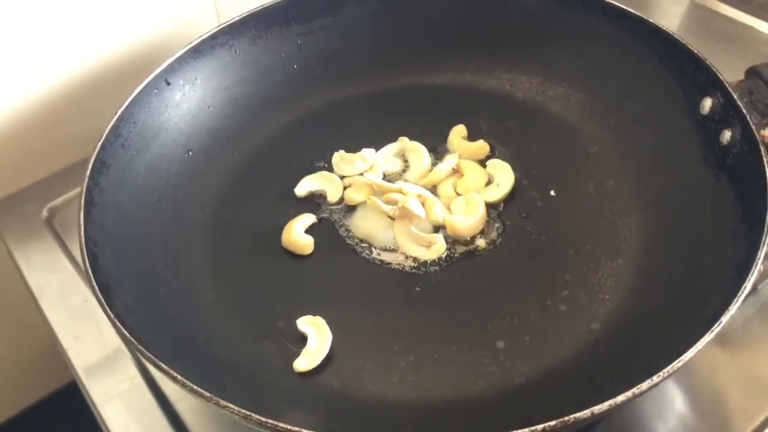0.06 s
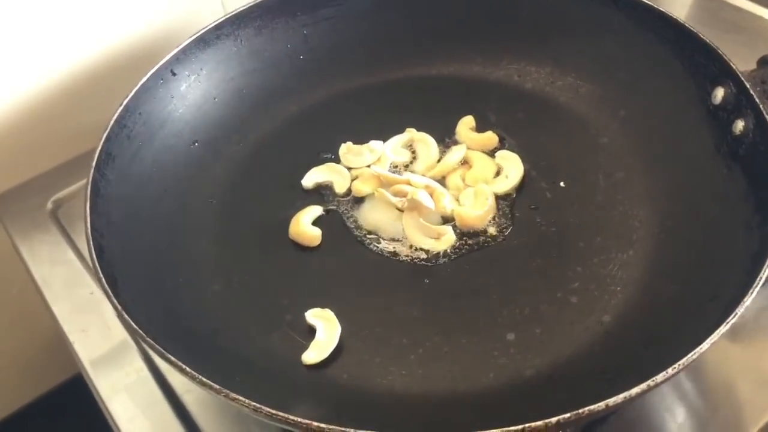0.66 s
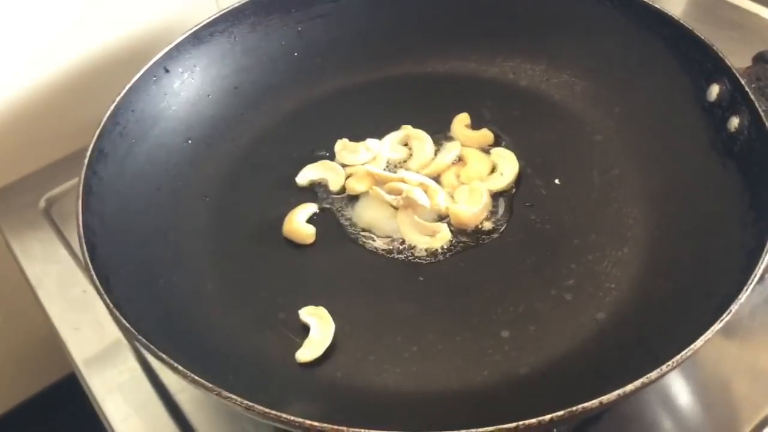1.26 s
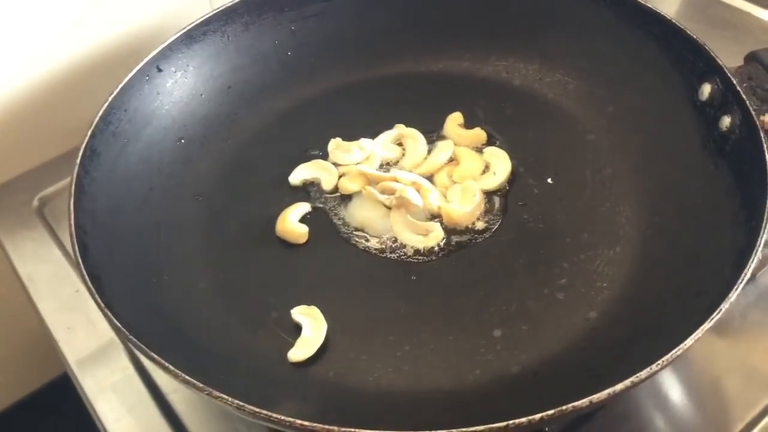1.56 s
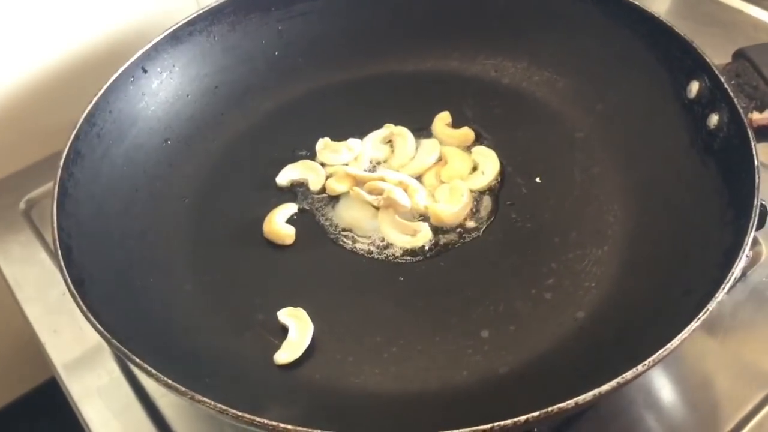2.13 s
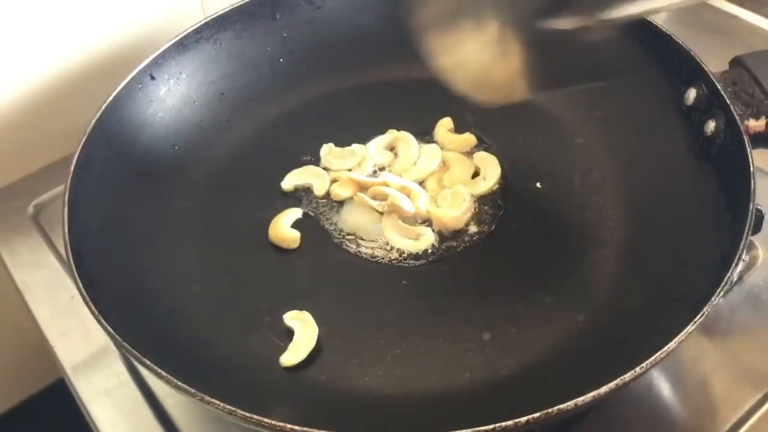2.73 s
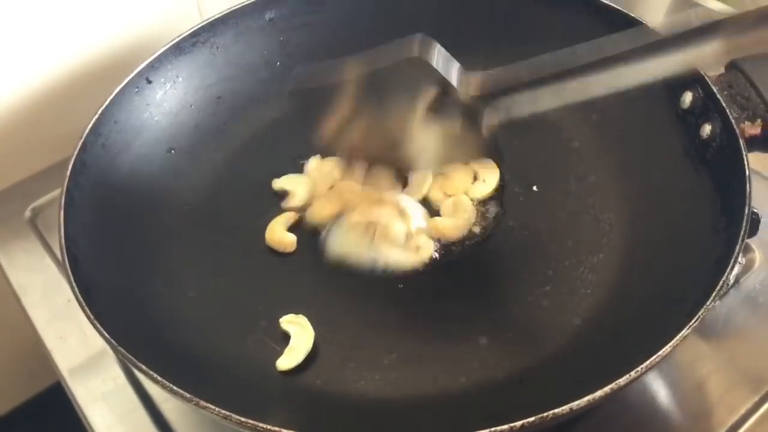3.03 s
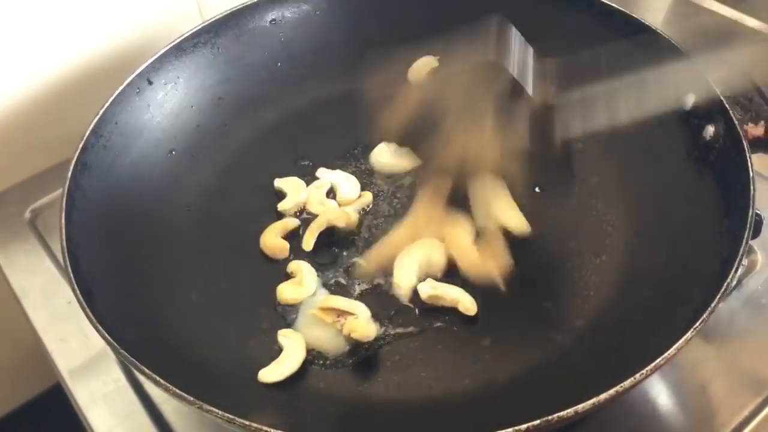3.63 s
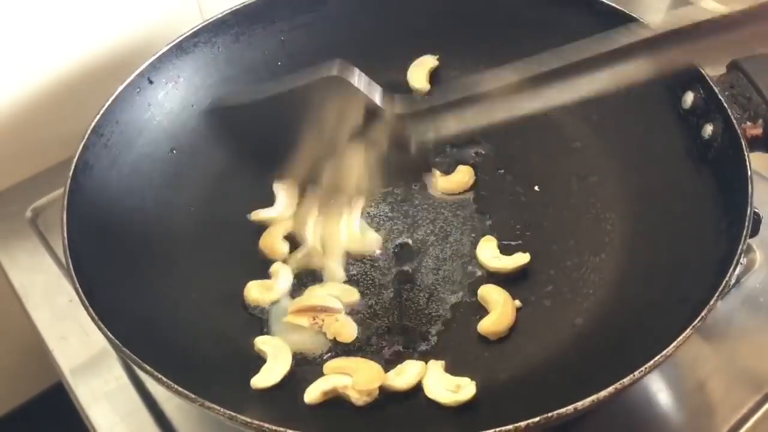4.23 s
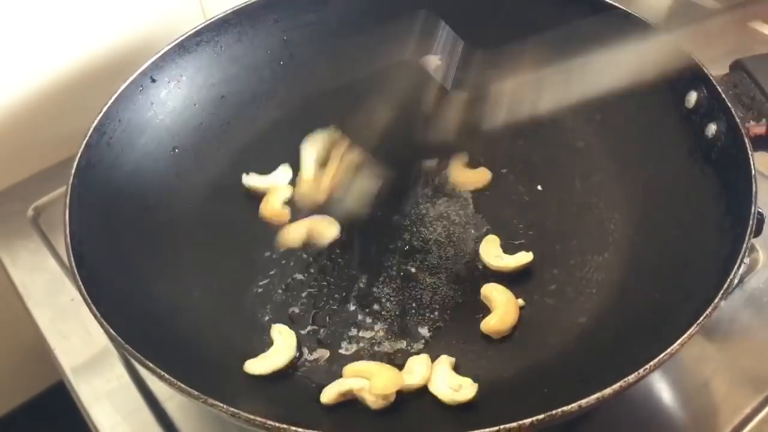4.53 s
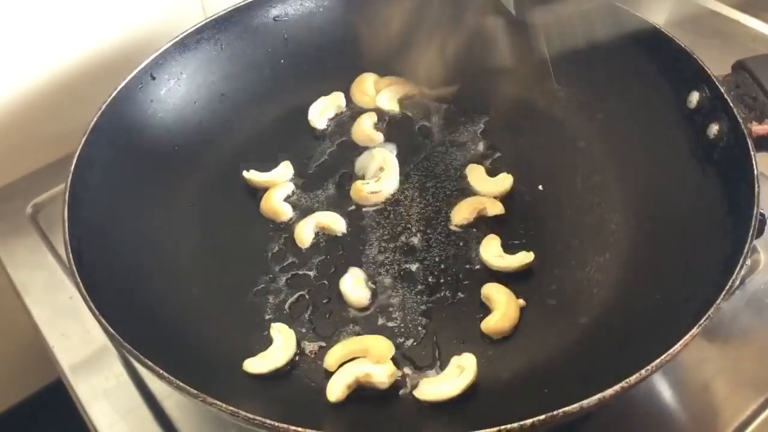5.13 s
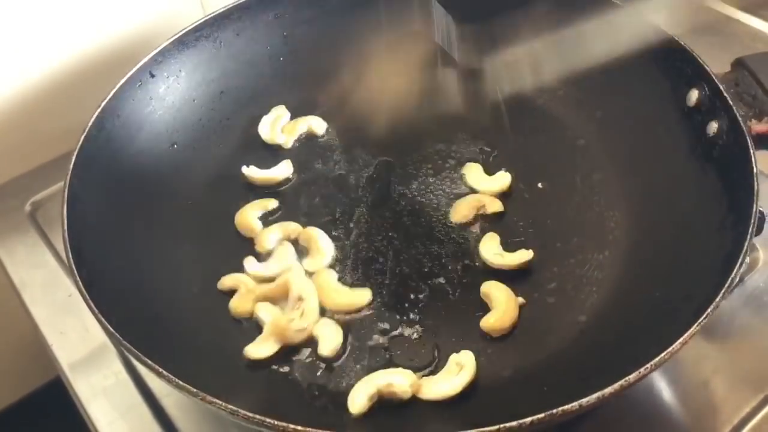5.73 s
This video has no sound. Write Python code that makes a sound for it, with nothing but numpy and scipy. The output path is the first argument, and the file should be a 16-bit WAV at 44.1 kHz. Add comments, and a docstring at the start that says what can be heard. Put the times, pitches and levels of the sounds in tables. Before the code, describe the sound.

A short burst of hissing fat and a metallic clink open a close view by ear of nuts frying in a pan. Droplets pop irregularly over a low sizzle, with a few small taps and squeaks of steam. Then a spatula knocks and scratches across the pan about three times a second, while the spread fat fizzes louder. A faint kitchen hum lies underneath.

```python
"""Cashews fry in ghee in a nonstick pan, heard up close over the faint hum of a small kitchen.
First the wet fat flares up, hissing and whistling with steam, and a steel utensil clinks.
The sizzle dies down to single pops of bursting water droplets, with light taps, more clinks and
a few squeaks of vapour. From 3 s on, a spatula turns the nuts about three times a second,
knocking on the pan so that it rings, and the spread fat fizzes up with tiny bubbles."""
import sys
import numpy as np
from scipy import signal
from scipy.fft import rfft, irfft
from scipy.io import wavfile
from scipy.ndimage import uniform_filter1d

SR = 44100
rng = np.random.default_rng(int(sys.argv[2]) if len(sys.argv) > 2 else 0)


def unload_audio(sound):
    """Save the sound as a 16-bit wav file, at the path given as the first command line argument."""
    columns = np.transpose(np.atleast_2d(sound))
    # keep every value between -1 and 1, then stretch to whole-number steps
    steps = np.round(np.clip(columns, -1, 1) * 32767)
    wavfile.write(sys.argv[1], SR, steps.astype(np.int16))


N = 255339
TIME = np.arange(N) / SR
TOP_HZ = 15600  # the treble is cut above this

# Levels in the tables are relative: the functions add their own gain.
# A colour says how strong each frequency is. t60 is the time a sound takes to fall by 60 dB.
# colour of the kitchen air: f/Hz, level/dB
AIR_COLOUR = [(20, -9), (45, -0.5), (140, -4), (270, 1), (400, -5.5), (750, -8.5), (1300, -12.5),
              (2500, -12.5), (5000, -17.5)]
# tones of the mains hum: f/Hz, level/dB
HUM_TONES = [(48.4, -52), (96.9, -52), (150.7, -50.5)]
# light knocks of utensils and nuts: t/s, level/dB, f/Hz
LIGHT_TAPS = [(.088, -21.5, 680), (0.158, -19.5, 960), (1.032, -25, 1670), (1.132, -24, 1010),
              (1.652, -28, 3370), (1.786, -30.5, 2900), (1.832, -30.5, 1060), (2.11, -29, 1060),
              (2.527, -27.5, 940), (2.831, -26.5, 900), (2.831, -22.5, 3920), (3.881, -27, 1070),
              (4.662, -26, 1560), (5.131, -19, 4230), (5.418, -32, 1150), (5.62, -28.5, 720)]
# touches of the steel utensil: t/s, level/dB, treble boost/(dB per octave)
STEEL_TOUCHES = [(.138, -17, 3), (1.351, -24, 5), (1.393, -19, 15)]
# the steel's modes (the tones it rings with), one list each: f/Hz, level/dB, t60/s
STEEL_MODE_HZ = [4892, 10165, 10600, 12610, 13390]
STEEL_MODE_DB = [3.5, 7, 13.5, -10, -19]
STEEL_MODE_T60 = [1, 0.47, 0.043, .14, .31]
# modes of the pan on its support, one list each: f/Hz, level/dB, t60/s
PAN_MODE_HZ = [225, 268, 328, 388, 455, 745, 849, 1056, 1222]
PAN_MODE_DB = [-12, -3, 6, -11.5, -12, -7.5, -1, -13.5, 15]
PAN_MODE_T60 = [0.057, 0.83, 0.43, 0.48, 0.72, 0.062, 0.34, 0.28, 0.14]
# one soft nudge of the pan: t/s, level/dB
PAN_NUDGE = (.158, -20.5)
# spatula on the pan: t/s, force/dB, blade f/Hz, thump level/dB, scratch level/dB, scratch f/Hz
SPATULA_STROKES = [(3.007, -4.5, 908, -29.5, -12, 3770), (3.295, -8, 1052, -31.5, -17, 4070),
                   (3.59, -11, 1160, -28, -18.5, 5080), (3.825, -6.5, 1098, -27.5, -13.5, 3800),
                   (4.129, -18, 950, -31.5, -17, 3600), (4.436, -7, 1056, -25, -13, 3650),
                   (4.738, -4.5, 987, -30.5, -18, 3200), (4.986, -11, 1017, -31, -16.5, 3760),
                   (5.331, -14, 997, -31.5, -30, 5220), (5.697, -6, 1170, -26.5, -16.5, 1490)]
# colours of a thump and of a scratch on the pan: f/Hz, level/dB
THUMP_COLOUR = [(90, -50), (170, -5.5), (300, -5), (520, -5.5), (800, -6), (1300, -15.5), (2200, -7),
                (5000, -49.5)]
SCRATCH_COLOUR = [(500, -15.5), (1300, 0.5), (2000, -2.5), (2600, 0), (3700, 3.5), (5500, -2.5),
                  (8000, 1.5), (12000, -6.5), (16000, -32)]
# vapour buzzing out from under a nut: t/s, f/Hz, length/s, level/dB, treble boost/dB
VAPOUR_SQUEAKS = [(1.349, 1374, 0.019, -20, -4.5), (1.677, 1703, 0.025, -22.5, 14),
                  (2.27, 3840, .04, -55, -2), (2.344, 2160, 0.014, -25, 5)]
# colour of that buzz: f/Hz, level/dB
VAPOUR_COLOUR = [(600, -21), (1400, -9), (2800, -3.5), (4200, -8), (7000, 3.5), (10500, 8), (13500, 2),
                 (16000, -18)]
# wet fat flares up twice at the start: t/s, length/s, level/dB
FAT_FLARES = [(0, 0.11, -10), (0.141, 0.014, -9)]
# colour of the flare's hiss: f/Hz, level/dB
HISS_COLOUR = [(200, 2.5), (500, -2), (900, -10.5), (1700, -16), (2400, -12.5), (3800, -13), (5000, -9),
               (7000, -7), (11000, -1), (13500, -3.5), (15500, -9)]
# steam whistling in the flare: t/s, f/Hz, length/s, level/dB
STEAM_WHISTLES = [(0.038, 8390, 0.015, -14.5), (0.057, 6900, 0.017, -16), (0.068, 5990, 0.035, -21),
                  (0.085, 8000, 0.014, -20)]
# the loudest bursting droplets: t/s, level/dB, cavity f/Hz, brightness/dB
DROPLET_POPS = [(0.1033, -5, 7140, -9), (0.1331, 4.5, 4860, -10), (0.3052, -4.5, 4970, -23),
                (0.4208, -10, 7870, -17), (0.4391, -3.5, 7400, -41), (0.4866, -10.5, 4900, -3),
                (0.5304, -6.5, 4600, -43), (0.5561, -4.5, 4100, -12), (0.5895, 0.5, 7230, -37),
                (0.6942, -10.5, 7500, -5), (0.7146, -12, 6070, -5), (0.7869, 0, 5100, -18),
                (0.829, -7, 6200, -22), (0.8889, -7, 6100, -23), (0.9938, -2.5, 6100, -23),
                (1.1069, -8, 7050, -5), (1.1304, -1.5, 6150, -14), (1.2562, -7, 3680, -19),
                (1.287, -9.5, 5650, -32), (1.3179, -10.5, 4620, -23), (1.3924, -3, 7700, -13),
                (1.4642, 2, 3550, -3), (1.6814, -7.5, 4070, -29), (1.7817, -6.5, 7760, -11),
                (1.8296, -6, 3820, -25), (1.8986, 1, 7920, -0.5), (1.9954, -6.5, 4300, -28),
                (2.0038, -3, 5060, -11), (2.1011, -8, 4200, -12), (2.1322, -6, 4550, -15),
                (2.2866, -7, 7600, -20), (2.4847, -11.5, 5330, -32), (2.5652, -6, 5330, -26),
                (2.769, -10.5, 7390, -19), (2.831, 10, 7320, -27), (3.1686, -4, 5480, -41),
                (3.1901, -8, 6300, -43), (3.3706, -6, 6200, 16), (3.5219, -0.5, 7740, -1),
                (3.5354, -5, 7590, 0), (3.59, 3, 5260, -10), (3.7473, -2.5, 7940, -4),
                (3.9031, -2, 5230, -22), (4.3108, 1.5, 6500, -10), (4.6356, -0.5, 5650, -8),
                (4.9694, -4.5, 7600, -13), (5.1775, -2, 7410, -15), (5.452, 0, 7160, -7),
                (5.5062, -2, 6600, -9)]
# how lively the fat is, low while the nuts lie still and high once stirred: t/s, level/dB
FIZZ_LEVEL = [(.3, -33), (.72, -32.5), (1.08, -31.5), (1.45, -34.5), (1.7, -30.5), (2.05, -36),
              (2.25, -36.5), (2.5, -31), (3.0, -34.5), (3.26, -28), (3.38, -23.5), (3.9, -23), (4.1, -23.5),
              (4.55, -25), (4.7, -22), (4.97, -20.5), (5.3, -23), (5.75, -21.5)]
# colour of the fizz: f/Hz, level/dB
FIZZ_COLOUR = [(400, -36), (900, -9), (2000, -13.5), (3000, -9), (4200, -6.5), (6300, -3), (8000, 0.5),
               (9300, -4.5), (10700, 3.5), (12500, -1.5), (14500, -18), (16000, -0.5)]


def undb(db):
    """Turn decibels into a gain to multiply by."""
    return 10 ** (np.asarray(db) / 20)


def unit(x):
    """Scale a sound to an average strength (rms) of 1."""
    return x / np.sqrt(np.mean(x ** 2) + 1e-20)


def curve(table):
    """Join a table's (time, value) points with straight lines."""
    times, values = np.transpose(table)
    return np.interp(TIME, times, values)


def colour(x, points):
    """Make each frequency louder or softer, following (f/Hz, level/dB) points."""
    hz, db = np.transpose(points)
    size = 4096
    bin_hz = np.arange(size // 2 + 1) * SR / size
    log_gain = np.log(undb(np.interp(np.log(bin_hz + 1), np.log(hz), db)))
    # fold the filter so that it never sounds before its input does
    cepstrum = irfft(log_gain)
    cepstrum[1:size // 2] *= 2
    cepstrum[size // 2 + 1:] = 0
    return signal.fftconvolve(x, irfft(np.exp(rfft(cepstrum))))[:len(x)]


def fade(t, t60):
    """Die away by 60 dB every t60 seconds."""
    return undb(-60 * t / t60)


def swell(start, length, db, attack, t60):
    """A loudness shape that rises, holds until its length is up and dies away."""
    age = TIME - start
    return undb(db) * np.clip(age / attack, 0, 1) * fade(np.maximum(age - length, 0), t60)


def resonate(x, hz, q):
    """Make a sound ring at one pitch; a higher q rings longer."""
    return signal.lfilter(*signal.iirpeak(min(hz, .4 * SR), max(q, 1), SR), x)


def ring(modes, t):
    """A struck object: one fading tone for each (f/Hz, level/dB, t60/s) mode."""
    return sum(undb(db) * fade(t, t60) * np.sin(2 * np.pi * (hz * t + rng.random()))
               for hz, db, t60 in modes)


def peak(x, db, size=176):
    """Scale a sound so that its loudest stretch of `size` samples has this level."""
    return x * undb(db) / np.sqrt(uniform_filter1d(x ** 2, size).max() + 1e-20)


def add(out, start, x):
    """Mix a sound in at `start` seconds."""
    i = int(np.clip(start * SR, 0, N - 1))
    out[i:i + len(x)] += x[:N - i]


def burst(t, t60, tail_db, tail_t60):
    """A crack of noise with a weaker, longer tail."""
    return rng.standard_normal(len(t)) * (fade(t, t60) + undb(tail_db) * fade(t, tail_t60))


def bubbles(rate, spread_db, q, low_hz, high_hz, count=16):
    """About `rate` tiny bubbles burst each second, each ringing at one of `count` pitches."""
    out = 0
    for hz in np.geomspace(low_hz, high_hz, count):
        chance = rng.random(N) * count * SR / rate
        born, kicks = np.flatnonzero(chance < 1), np.zeros(N)
        rarity = np.minimum(-np.log(chance[born]), 4.5)
        kicks[born] = undb(spread_db * rarity) * (-1) ** born  # spread above 0: rare ones are louder
        out = out + resonate(kicks, hz, q)
    return unit(out)


def background():
    """Steady kitchen air, mains hum and a faint low rumble that swells once."""
    air = unit(colour(rng.standard_normal(N), AIR_COLOUR)) * undb(-42)
    hum = sum(undb(db - 3) * np.sqrt(2) * np.sin(2 * np.pi * (hz * TIME + rng.random()))
              for hz, db in HUM_TONES)
    rumble = unit(colour(rng.standard_normal(N), [(12, 12), (30, 27), (55, 12), (120, -37), (500, -78)]))
    rumble_gain = undb(-65) + swell(start=2.19, length=0.71, db=-49, attack=0.11, t60=0.25)
    return air + hum + rumble * rumble_gain


def room(x, wet_db, t60_low, t60_high):
    """Add the blurred echoes of a small, hard kitchen; the treble dies sooner."""
    t = TIME[:SR // 2]
    low = signal.sosfilt(signal.butter(2, 3000, fs=SR, output="sos"), rng.standard_normal(len(t)))
    high = signal.sosfilt(signal.butter(2, 3000, "high", fs=SR, output="sos"),
                          rng.standard_normal(len(t)))
    tail = (low * fade(t, t60_low) + high * fade(t, t60_high)) * np.minimum(t / 0.0021, 1)
    return x + undb(wet_db) * signal.fftconvolve(x, tail / np.linalg.norm(tail))[:N]


def knocks():
    """Utensils and nuts make small dull taps, and the nudged pan thumps once."""
    out, t = np.zeros(N), TIME[:SR]
    for start, db, hz in LIGHT_TAPS:
        hit = burst(t, t60=0.082, tail_db=-12.5, tail_t60=0.22)
        contact = colour(hit, [(120, -14), (400, 0.5), (1800, 11.5), (4200, 10.5), (9000, -39)])
        add(out, start, peak(resonate(contact, hz, q=1.3 + hz / 700), db - .5))
    start, db = PAN_NUDGE
    thump = colour(burst(t, t60=0.13, tail_db=-10, tail_t60=0.42), THUMP_COLOUR)
    add(out, start, peak(thump, db - 3))
    return out


def clinks():
    """Steel rings on after a touch; each touch favours the high modes by its own amount."""
    out, hz = np.zeros(N), np.array(STEEL_MODE_HZ)
    for start, db, tilt_db in STEEL_TOUCHES:
        modes = zip(hz, STEEL_MODE_DB + tilt_db * np.log2(hz / hz[0]), STEEL_MODE_T60)
        add(out, start, peak(ring(modes, TIME[:SR]), db))
    return out


def pan_ring():
    """The pan rings hollow after every stroke; the soft nudge moves mostly its low modes."""
    out, t = np.zeros(N), TIME[:SR]
    modes = list(zip(PAN_MODE_HZ, PAN_MODE_DB, PAN_MODE_T60))
    for start, _, _, thump_db, *_ in SPATULA_STROKES:
        # each stroke lands on a new spot, so the mix of modes changes
        struck = [(hz, db + 3.6 * rng.standard_normal(), t60) for hz, db, t60 in modes]
        add(out, start, peak(ring(struck, t), thump_db + 4))
    start, db = PAN_NUDGE
    low_ring = resonate(ring(modes, t), hz=318, q=3.1) * fade(t, t60=0.71)
    add(out, start, peak(low_ring, db))
    return out


def spatula():
    """Each stroke rings the blade at a pitch set by the grip, thumps the pan and scratches it."""
    out, t = np.zeros(N), TIME[:SR // 2]
    landing = np.minimum(t / 0.0014, 1)  # the bendy blade takes a moment to settle
    for start, force_db, hz, thump_db, scratch_db, scratch_hz in SPATULA_STROKES:
        blade_t60 = 0.38 * undb(-0.47 * (force_db + 5.5))  # pressing harder stops the ring sooner
        chatter = landing * burst(t, t60=0.03, tail_db=-16, tail_t60=blade_t60)
        blade = resonate(resonate(chatter, hz, q=8.4), hz, q=2.9)
        thump = colour(landing * burst(t, t60=0.013, tail_db=-8, tail_t60=0.39), THUMP_COLOUR)
        scratch = colour(burst(t, t60=0.031, tail_db=-8, tail_t60=0.2), SCRATCH_COLOUR)
        scratch += 0.65 * resonate(scratch, scratch_hz, q=19)
        stroke = peak(blade, force_db - 7.5) + peak(thump, thump_db + 6) + peak(scratch, scratch_db + 4)
        add(out, start, stroke)
    return out


def squeaks():
    """Vapour flutters through a film of fat: a short, unsteady buzz rich in overtones."""
    out = np.zeros(N)
    for start, hz, length, db, bright_db in VAPOUR_SQUEAKS:
        t = TIME[:int(length * SR)]
        waver = unit(uniform_filter1d(rng.standard_normal(len(t)), size=30))
        phase = 2 * np.pi * np.cumsum(hz * (1 + 0.022 * waver)) / SR
        buzz = sum(np.sin(k * phase + 2 * np.pi * rng.random()) for k in range(1, int(TOP_HZ / hz) + 1))
        jet = colour(unit(buzz) + 0.33 * rng.standard_normal(len(t)), VAPOUR_COLOUR)
        jet = colour(jet, [(2000, 0), (12000, bright_db)])
        shape = np.minimum(t / .001, 1) * np.sqrt(1 - t / length)
        add(out, start, peak(jet * shape, db))
    return out


def flare():
    """Wet fat spits a dense hiss of ringing bubbles, and jets of steam whistle for an instant."""
    hiss = bubbles(14000, spread_db=-0.5, q=1.5, low_hz=880, high_hz=14400)
    singing = bubbles(930, spread_db=1, q=420, low_hz=4430, high_hz=14170, count=36)
    surge = sum(swell(*row, attack=0.001, t60=0.13) for row in FAT_FLARES)
    out = unit(colour(hiss + singing, HISS_COLOUR)) * surge * undb(-4)
    for start, hz, length, db in STEAM_WHISTLES:
        shape = np.hanning(int(length * SR))
        whistle = unit(resonate(rng.standard_normal(len(shape)), hz, q=110))
        add(out, start, undb(db) * shape * whistle)
    return out


def crackle():
    """Small lone bubbles tick all the time, each at its own pitch, louder when the fat is lively."""
    out, t, fizz_db = np.zeros(N), TIME[:SR // 100], curve(FIZZ_LEVEL)
    for when, size, pitch, ringing in rng.random(size=(800, 4)):
        hz = 3100 * 4 ** (pitch ** .8)
        tick = resonate(burst(t, t60=0.0017, tail_db=-12, tail_t60=0.025), hz, q=3 + 6 * ringing)
        db = -34.5 + 14 * size ** 3 + 3 * pitch + 0.56 * (fizz_db[int(when * N)] + 32.5)
        add(out, when * N / SR, peak(tick, db, size=44))
    return out


def pops():
    """A water droplet bursts: a snap rings the cavity (the hollow it leaves), then spray splutters."""
    out, t = np.zeros(N), TIME[:SR // 6]
    crack_colour = [(400, -18.5), (2000, -17.5), (3500, -3), (7000, 1.5), (10500, 2), (15500, -12.5)]
    for start, db, hz, bright_db in DROPLET_POPS:
        snap = burst(t, t60=0.0025, tail_db=-15.5, tail_t60=0.019) * np.minimum(t / 0.00062, 1)
        cavity = peak(resonate(snap, hz, q=18.4), -18.5 - 0.07 * bright_db, size=44)  # more if dull
        crack = peak(colour(snap, crack_colour), -10, size=44)
        spit = peak(resonate(resonate(snap, 10300, q=8.5), 11700, q=2.2), bright_db - 4.5, size=44)
        splutter = undb(2.6 * unit(uniform_filter1d(rng.standard_normal(len(t)), size=50)))
        spray = colour(splutter * burst(t, t60=0.028, tail_db=-0.5, tail_t60=0.28), FIZZ_COLOUR)
        spray_db = db - 20 - 0.24 * max(db - 2, 0)  # spray grows more slowly for the biggest pops
        add(out, start, peak(cavity + crack + spit, db - 7, size=44) + peak(spray, spray_db))
    return out


def sizzle():
    """Countless bubbles fizz; the livelier the fat, the more of them burst and the more it froths."""
    fizz_db = curve(FIZZ_LEVEL)
    lively_db = np.clip(fizz_db + 28.5, -15, 12)
    # bubbles come in flurries a few hundredths of a second long
    flurry = unit(uniform_filter1d(uniform_filter1d(rng.standard_normal(N), size=700), size=700))
    rate = 3000 * undb(0.6 * lively_db + 3.3 * flurry)
    fine = unit(colour(bubbles(rate, spread_db=3, q=2.2, low_hz=1130, high_hz=15800), FIZZ_COLOUR))
    # freshly spread fat froths with tiny, high-pitched bubbles
    froth = bubbles(0.26 * rate, spread_db=0, q=19, low_hz=6130, high_hz=12460)
    # larger ones simmer around the nuts whatever the spatula does
    simmer = bubbles(350, spread_db=5.5, q=6.8, low_hz=3060, high_hz=6840)
    fizz = fine * undb(-2.5) + froth * undb(0.42 * lively_db - 10)
    return fizz * undb(fizz_db) + simmer * undb(-45.5)


def scene():
    """Frying and stirring echo in the kitchen; ringing metal and the background join without echo."""
    frying = sizzle() + crackle() + flare() + squeaks() + pops()
    kitchen = room(frying + spatula() + knocks(), wet_db=-7, t60_low=0.51, t60_high=0.33)
    return (kitchen + pan_ring() + clinks() + background())[None]


def record(dry):
    """The sharpest pops are flattened at full level, and the highest treble is cut."""
    treble_cut = signal.ellip(10, .2, 80, TOP_HZ, fs=SR, output="sos")
    return signal.sosfilt(treble_cut, np.clip(dry, -1, 1))


dry = scene()
out = record(dry)
unload_audio(out)
```